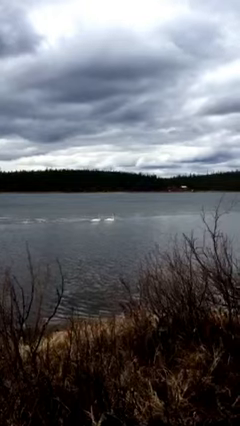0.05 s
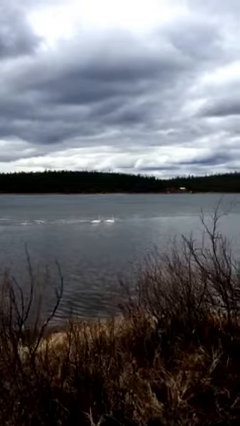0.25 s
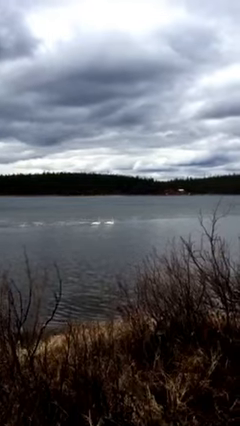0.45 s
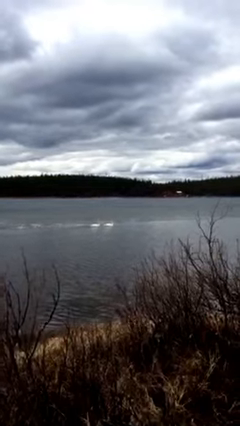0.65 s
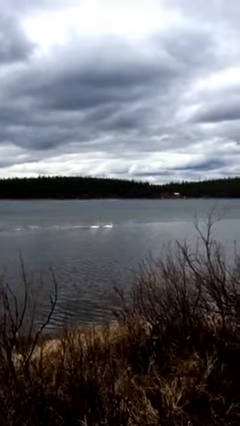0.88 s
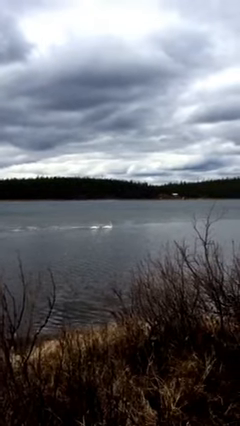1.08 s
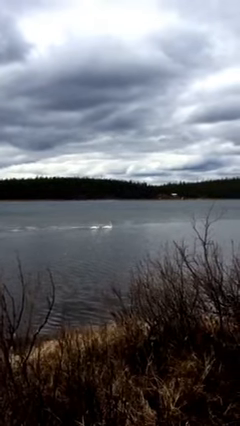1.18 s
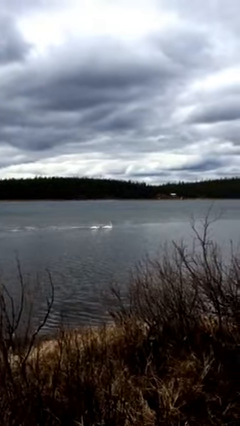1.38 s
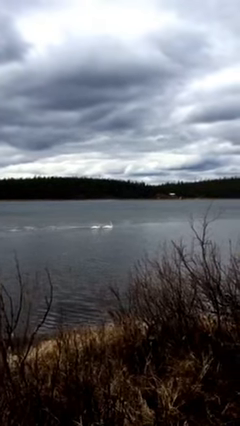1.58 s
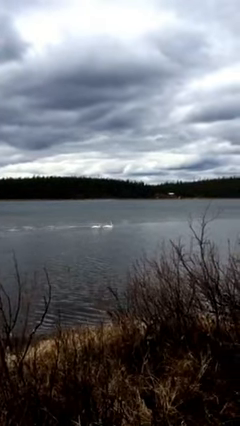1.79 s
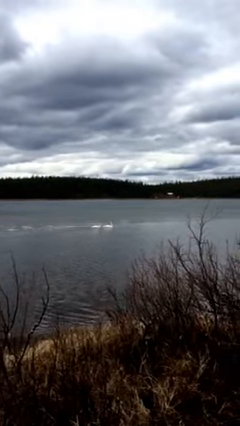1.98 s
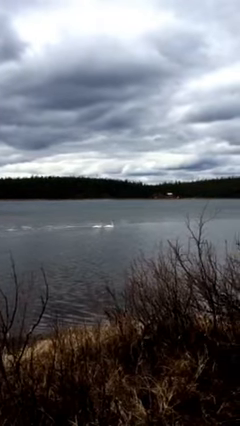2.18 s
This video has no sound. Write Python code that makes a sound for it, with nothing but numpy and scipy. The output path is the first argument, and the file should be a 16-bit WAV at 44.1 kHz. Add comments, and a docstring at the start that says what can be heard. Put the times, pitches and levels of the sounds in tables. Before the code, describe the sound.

One brief swan honk, hoarse then clear and sagging, across open water amid wind rumble and soft hiss.

```python
"""Far out on a lake, a swan gives one short honk: a rough, low start that breaks up into a clean note and sags.
The voice is two overlapping registers built from harmonics, with combination tones and noisy rasp.
The shore returns a faint tail of scattered echoes. Gusts buffet the microphone with bursts of low noise,
over a steady soft hiss of air and water that has a few faint swells."""
import sys
import numpy as np
from scipy import signal
from scipy.fft import rfft, irfft
from scipy.io import wavfile
from scipy.ndimage import uniform_filter1d

SR = 44100
rng = np.random.default_rng(int(sys.argv[2]) if len(sys.argv) > 2 else 0)


def bounce(signal):
    """Save signal as a 16-bit WAV file at the path given by the first command-line argument."""
    frames = np.transpose(np.atleast_2d(signal))
    limited = np.clip(frames, -1, 1)
    pcm = np.round(limited * 32767).astype(np.int16)
    wavfile.write(sys.argv[1], SR, pcm)


N = 99225  # samples: 2.25 s
T = np.arange(N) / SR  # time of each sample [s]
HZ = np.fft.rfftfreq(N, 1 / SR)  # frequency of each spectrum bin [Hz]

# The honk's low register, then the high one it breaks into; they overlap and beat:
# (time [s], pitch [Hz], effort: level of the second harmonic [dB], level of the fundamental [dB])
LOW_REGISTER = [(1.569, 308, -81, -84), (1.585, 309, -64, -62), (1.593, 276, -65, -61),
                (1.599, 315, -45, -57), (1.606, 341, -50, -61), (1.613, 336, -40, -58),
                (1.619, 327, -48, -66), (1.626, 321, -63, -76), (1.665, 342, -67, -90)]
HIGH_REGISTER = [(1.603, 386, -61, -75), (1.611, 385, -46, -63), (1.619, 395, -41, -59),
                 (1.633, 399, -43, -62), (1.655, 394, -43, -57), (1.673, 373, -44, -65),
                 (1.682, 338, -59, -60), (1.703, 345, -77, -75)]
# How rough the voice is: (time [s], roughness [0-1])
ROUGHNESS = [(1.585, .4), (1.6, 0.4), (1.615, 0.34), (1.625, 0.02), (1.64, 0.18), (1.68, 0.07)]
# Colour of the rasp in the throat: (frequency [Hz], relative level per Hz [dB])
RASP_SPECTRUM = [(100, -42), (210, -17), (275, -3), (450, -7), (530, -1), (680, -1), (880, -0.5),
                 (1050, -1.5), (1290, -2), (1450, -24), (2500, -47), (5000, -68)]
RASP_DB = -9.5  # at full roughness, against the effort of both registers
SIDEBAND_DB = -7.5  # strength of the combination tones


def swan():
    """Two registers sound together; where they overlap they make extra tones, and rough moments add noise."""
    low, low_turn, low_effort = register(LOW_REGISTER)
    high, high_turn, high_effort = register(HIGH_REGISTER)
    both_efforts = np.hypot(low_effort, high_effort)

    # Extra tones lie one beat below the low second harmonic and one beat above the high one
    beat = 2 * (high_turn - low_turn)
    overlap = low_effort * high_effort / (both_efforts + 1e-12)
    extra_tones = np.cos(2 * low_turn - beat) + np.cos(2 * high_turn + beat)
    sidebands = amp(SIDEBAND_DB) * overlap * extra_tones

    roughness = np.clip(curve(ROUGHNESS), 0, 1)
    rasp = amp(RASP_DB) * roughness * both_efforts * noise(RASP_SPECTRUM)
    return low + high + sidebands + rasp


# Upper harmonics of the voice: (harmonic number, level against the second harmonic [dB])
UPPER_HARMONICS = [(3, -23), (4, -50), (5, -64), (6, -43.5)]
CLOSE_AT_S, CLOSE_DB_PER_S = 1.652, 190  # the bill closes and dulls the upper harmonics


def register(points):
    """One register's sound, phase and effort: harmonics follow one pitch, and with effort the second leads."""
    s, hz, effort_db, fundamental_db = np.transpose(points)
    turn = 2 * np.pi * np.cumsum(np.interp(T, s, hz, left=0)) / SR  # phase [radians]
    sounding = (T > s[0]) * (T < s[-1])
    effort = amp(np.interp(T, s, effort_db)) * sounding
    fundamental = amp(np.interp(T, s, fundamental_db)) * sounding

    opening = amp(-CLOSE_DB_PER_S * np.maximum(T - CLOSE_AT_S, 0))
    upper = sum(amp(gain_db) * np.cos(round(k) * turn) for k, gain_db in UPPER_HARMONICS)
    overtones = np.cos(2 * turn) + opening * upper
    # The root of two makes each level an rms level
    sound = np.sqrt(2) * (fundamental * np.cos(turn) + effort * overtones)
    return sound, turn, effort


SHORE_DB, SHORE_T60_S, SHORE_DELAY_S = -31, 0.55, .006  # tail level, time to fall 60 dB, first echo


def shore(x):
    """Water and shore scatter the sound into many small echoes that die away."""
    echoes = rng.standard_normal(N) * (rng.random(N) < 2000 / SR)  # about 2000 echoes per second
    tail = echoes * amp(-60 * T / SHORE_T60_S) * (T > SHORE_DELAY_S)
    return amp(SHORE_DB) * signal.fftconvolve(x, tail / np.linalg.norm(tail))[:N]


# Gusts on the microphone: (time of the peak [s], spread to each side [s], level of the low throb [dB],
# level of the eddies [dB])
WIND_GUSTS = [(0.04, 0.013, -68.5, -72), (0.227, 0.013, -44, -58.5), (0.289, 0.016, -46.5, -77),
              (0.363, 0.0088, -41.5, -63), (0.44, 0.02, -46.5, -79), (0.492, 0.025, -46, -68),
              (0.596, 0.012, -45, -72), (0.681, .026, -39.5, -44), (.728, 0.027, -40, -52.5),
              (0.86, 0.0087, -53, -58), (0.936, 0.0095, -57, -78.5), (1.052, 0.012, -60, -67),
              (1.097, 0.0097, -53.5, -79), (1.215, 0.017, -62.5, -81), (1.439, 0.0073, -60, -72),
              (1.503, 0.028, -69, -73.5), (1.628, 0.026, -64, -89), (1.764, 0.0099, -50, -80),
              (1.856, 0.016, -48.5, -54), (1.982, 0.014, -44.5, -50.5), (2.126, 0.0045, -61, -82)]
# Colour of the low throb, then of the quicker eddies: (frequency [Hz], relative level per Hz [dB])
THROB_SPECTRUM = [(15, -55), (33, -30), (45, -8.5), (55, 2), (68, -0.5), (85, -10.5), (120, -26),
                  (170, -48), (250, -55), (600, -89)]
EDDY_SPECTRUM = [(45, -27), (75, 11.5), (100, 3), (135, -5), (180, -13), (250, -38), (400, -52.5),
                 (1000, -75)]
LULL_DB = -78.5  # throb that remains between gusts


def wind():
    """Each gust shakes the microphone with a low throb and sheds quicker eddies."""
    throb_power = sum((amp(db) * swell(at, spread)) ** 2 for at, spread, db, _ in WIND_GUSTS)
    eddy_power = sum((amp(db) * swell(at, spread)) ** 2 for at, spread, _, db in WIND_GUSTS)
    force = np.sqrt(amp(LULL_DB) ** 2 + throb_power)
    swirl = np.sqrt(eddy_power)
    return force * steadied(noise(THROB_SPECTRUM)) + swirl * steadied(noise(EDDY_SPECTRUM))


def steadied(x):
    """Evens out the chance swells of a noise, keeping its wandering pitch."""
    z = signal.hilbert(x)
    local_power = uniform_filter1d(abs(z) ** 2, size=400)  # averaged over about 9 ms
    return evened(z.real / np.sqrt(local_power + 0.13))


# Colour of the steady air and water: (frequency [Hz], relative level per Hz [dB])
HISS_SPECTRUM = [(20, -7.5), (60, 1.5), (150, 3.5), (250, 6), (450, 0), (900, -2.5), (1400, -5), (2100, -3),
                 (3000, -6), (4300, -7), (4850, -11), (5400, -8.5), (6700, -9.5), (7500, -12.5),
                 (9000, -11.5), (9900, -12.5), (10400, -18), (11200, -13.5), (15500, -17)]
HISS_DB = -74.5
# Faint swells in the hiss: (time of the peak [s], spread to each side [s], centre [Hz],
# half width [Hz], level at the peak [dB])
HISS_SWELLS = [(0.276, 0.03, 1650, 130, -79), (0.406, .05, 1900, 220, -85), (1.84, .05, 2330, 450, -83)]


def air():
    """Air and water make an even hiss of noise, with a few faint swells in its middle range."""
    out = amp(HISS_DB) * noise(HISS_SPECTRUM)
    for at, spread, hz, width_hz, db in HISS_SWELLS:
        band_shape = 1 / (1 + ((HZ - hz) / width_hz) ** 2)
        band = irfft(rfft(rng.standard_normal(N)) * band_shape, N)
        out = out + amp(db) * swell(at, spread) * evened(band)
    return out


def amp(db):
    """Turns decibels into a gain."""
    return 10 ** (np.asarray(db) / 20)


def evened(x):
    """Scales a sound to an rms (average strength) of one."""
    return x / np.sqrt(np.mean(abs(x) ** 2) + 1e-20)


def curve(points):
    """Joins points with straight lines to give a value at every sample."""
    return np.interp(T, *np.transpose(points))


def noise(points):
    """Shapes white noise to the given spectrum, at an rms of one."""
    hz, db = np.transpose(points)
    gain = amp(np.interp(np.log(HZ + 1), np.log(hz), db))
    return evened(irfft(rfft(rng.standard_normal(N)) * gain, N))


def swell(at, spread):
    """A rounded peak with soft skirts."""
    return 1 / np.cosh(np.clip((T - at) / spread, -60, 60))


def scene():
    """The swan and its tail, the wind and the hiss, in one channel."""
    honk = swan()
    return (honk + shore(honk) + wind() + air())[None]


EDGE_HZ = 15800  # top of the recorder's range


def record(dry):
    """The recorder's band limit: a steep filter removes what lies above the edge."""
    low_pass = signal.firwin(1023, EDGE_HZ, window=("kaiser", 9), fs=SR)
    return signal.oaconvolve(dry, low_pass[None], "same")


dry = scene()
out = record(dry)
bounce(out)
```